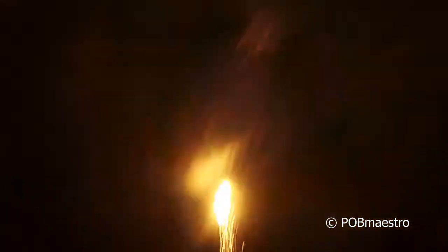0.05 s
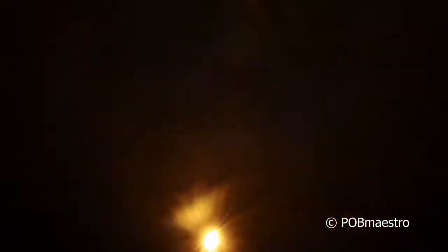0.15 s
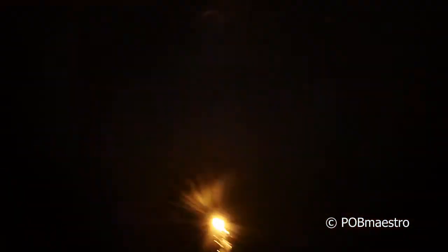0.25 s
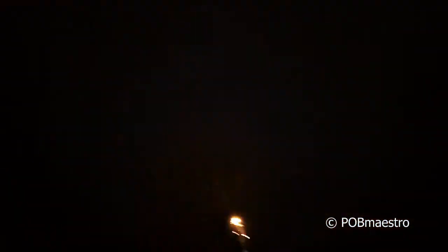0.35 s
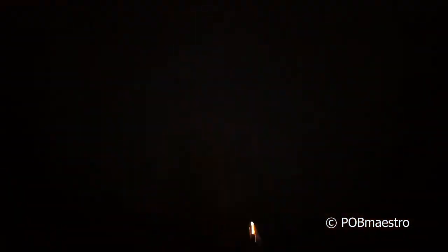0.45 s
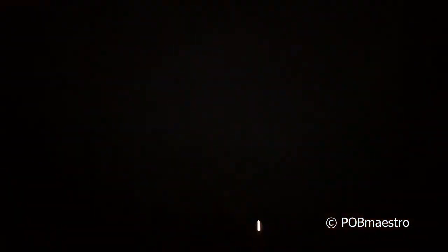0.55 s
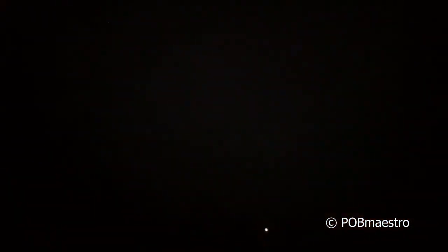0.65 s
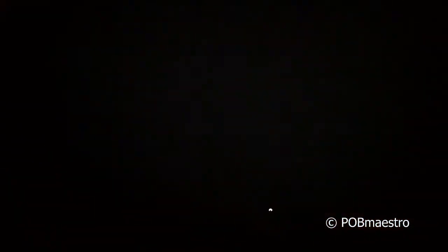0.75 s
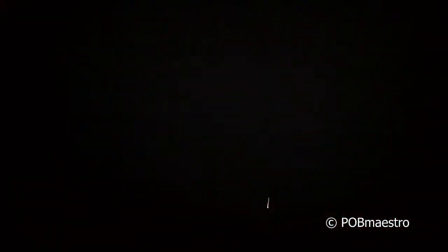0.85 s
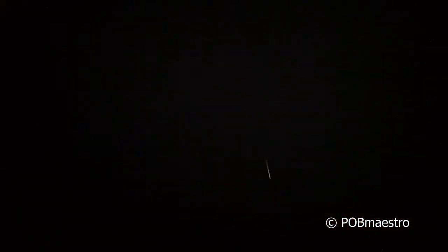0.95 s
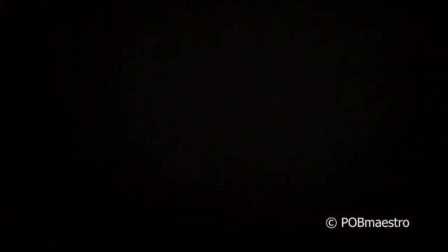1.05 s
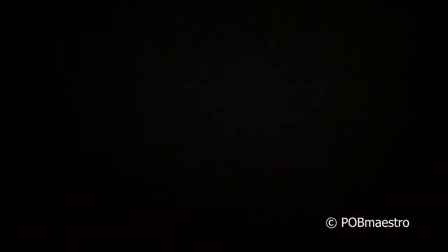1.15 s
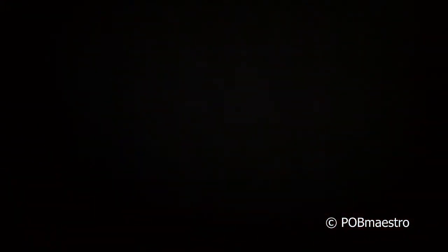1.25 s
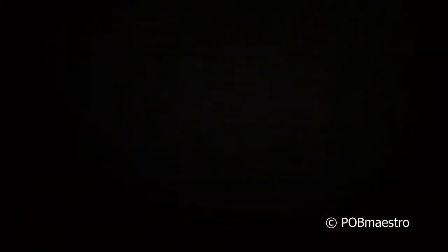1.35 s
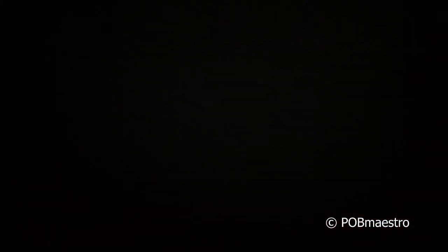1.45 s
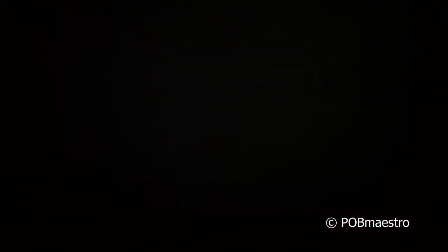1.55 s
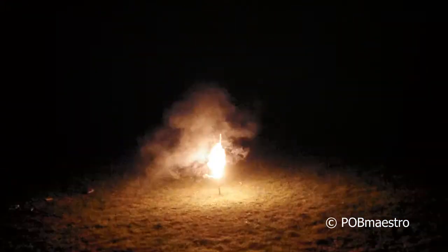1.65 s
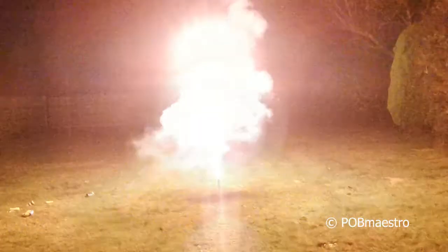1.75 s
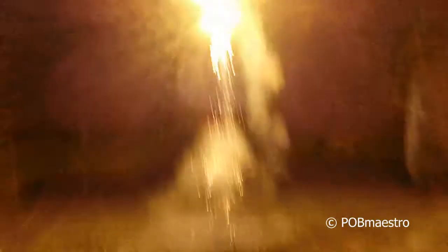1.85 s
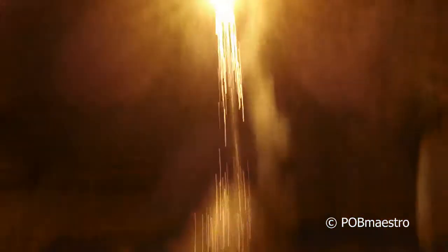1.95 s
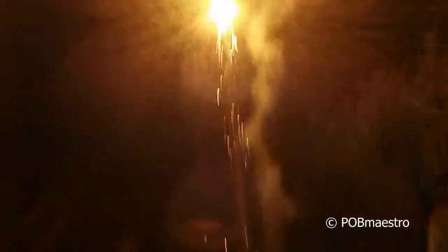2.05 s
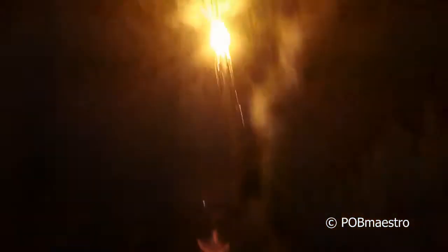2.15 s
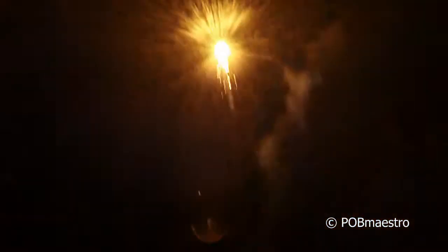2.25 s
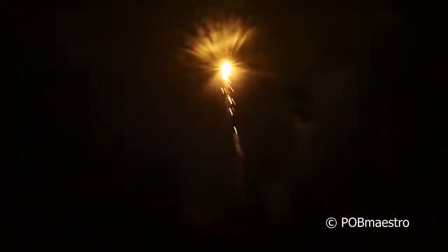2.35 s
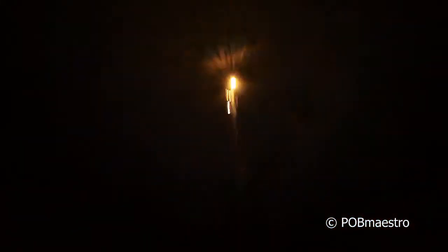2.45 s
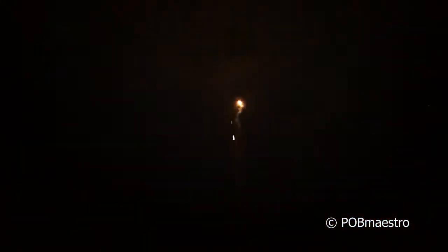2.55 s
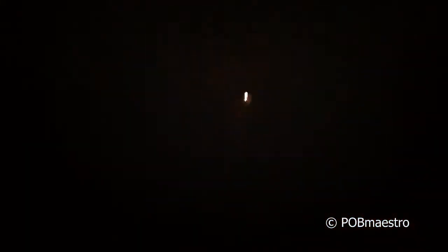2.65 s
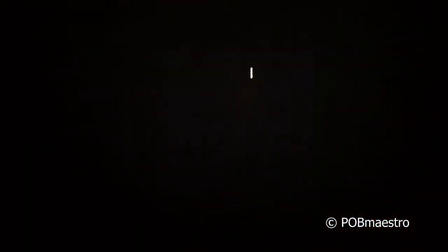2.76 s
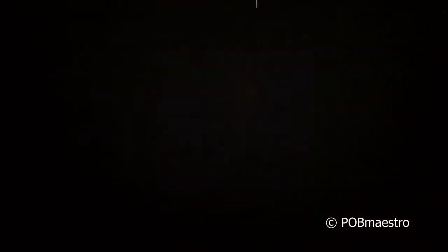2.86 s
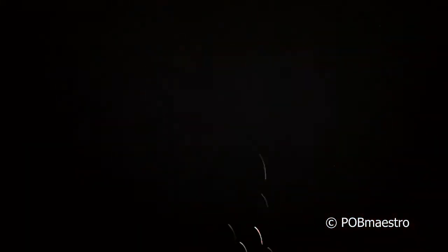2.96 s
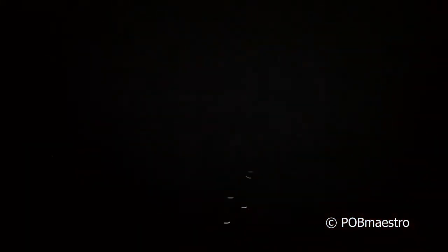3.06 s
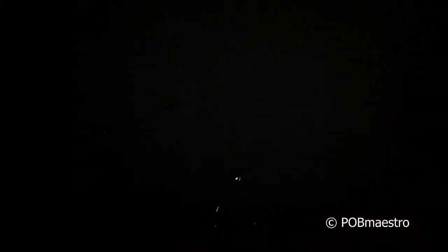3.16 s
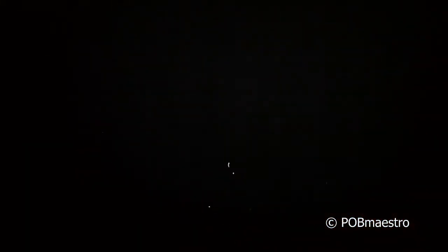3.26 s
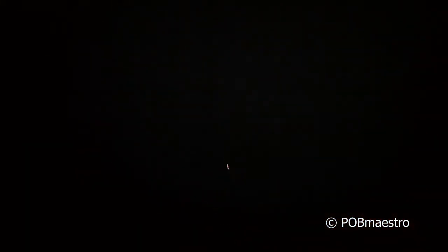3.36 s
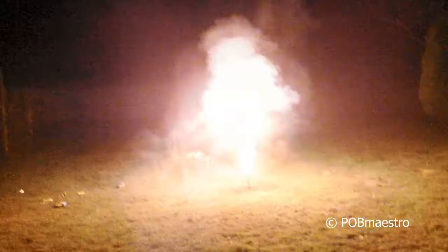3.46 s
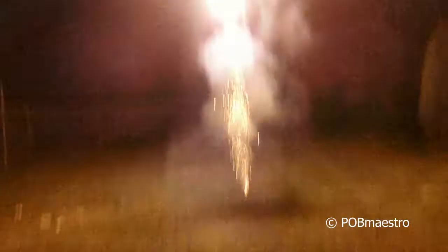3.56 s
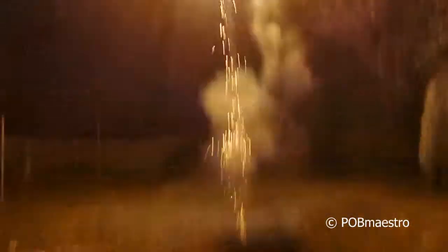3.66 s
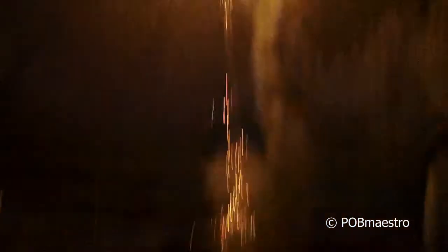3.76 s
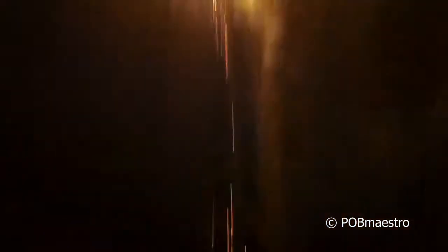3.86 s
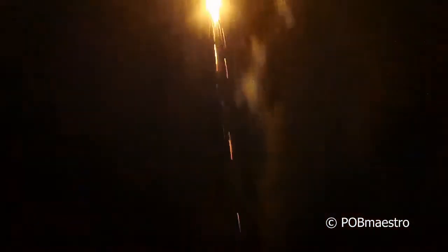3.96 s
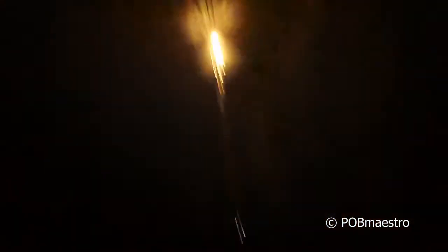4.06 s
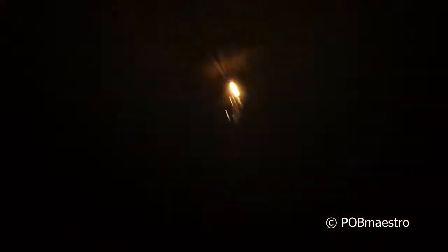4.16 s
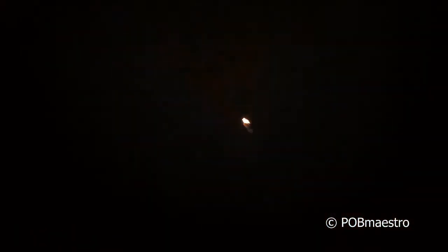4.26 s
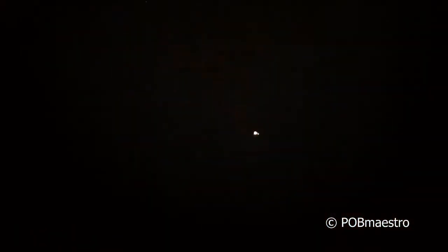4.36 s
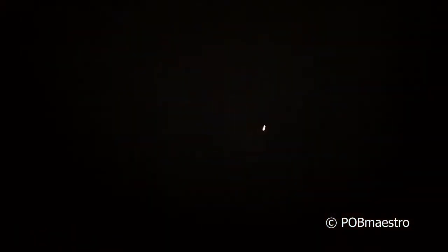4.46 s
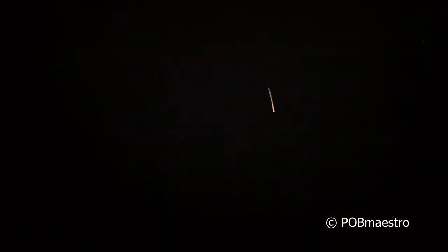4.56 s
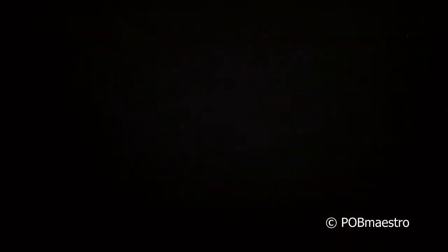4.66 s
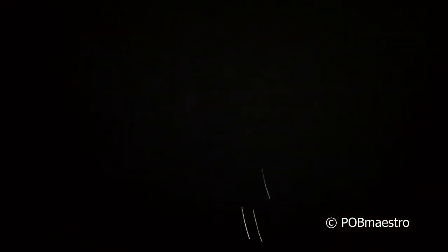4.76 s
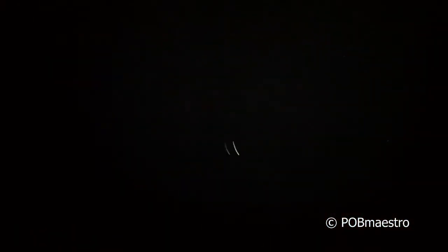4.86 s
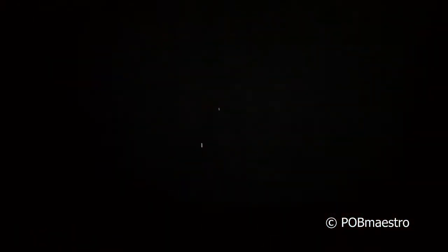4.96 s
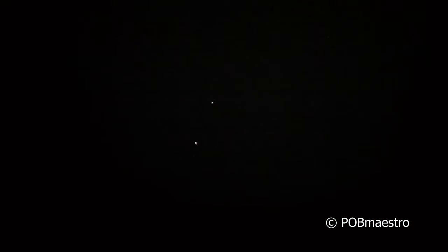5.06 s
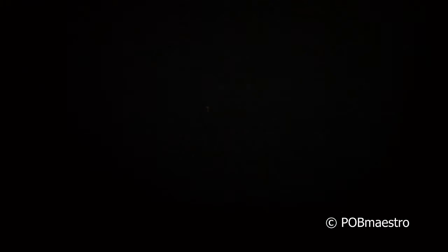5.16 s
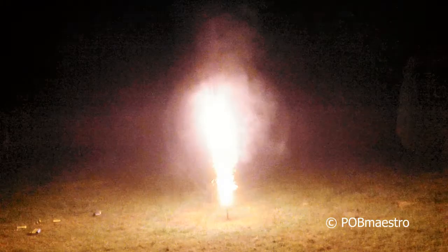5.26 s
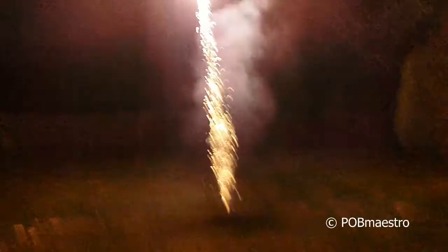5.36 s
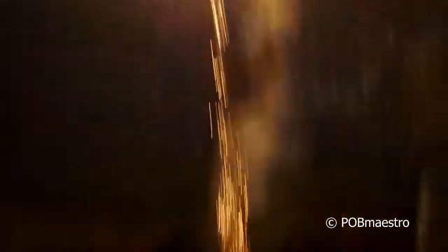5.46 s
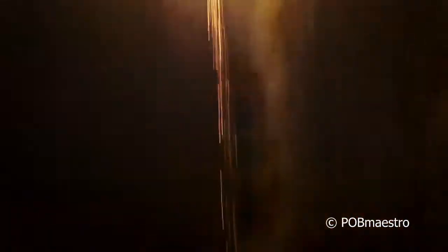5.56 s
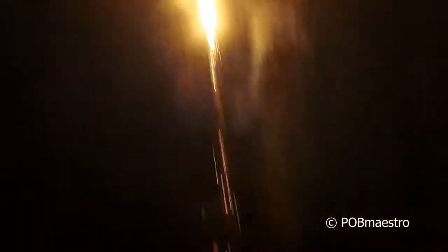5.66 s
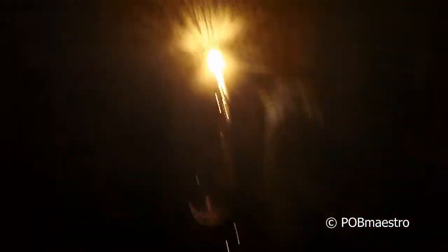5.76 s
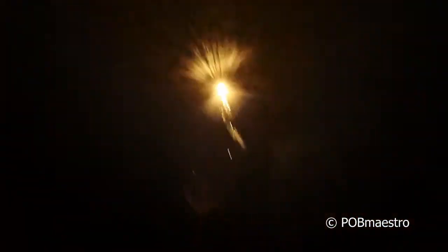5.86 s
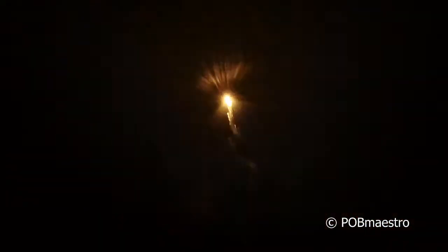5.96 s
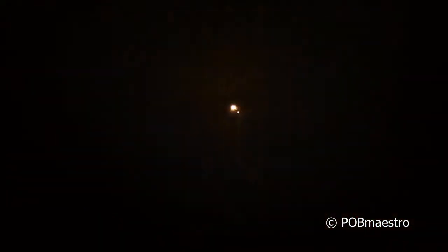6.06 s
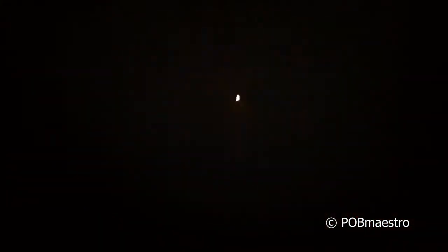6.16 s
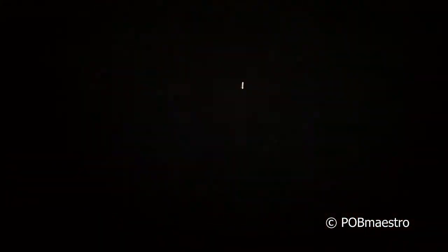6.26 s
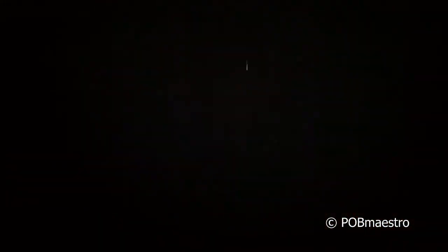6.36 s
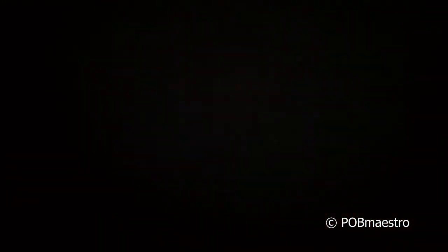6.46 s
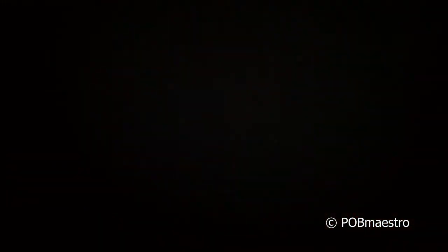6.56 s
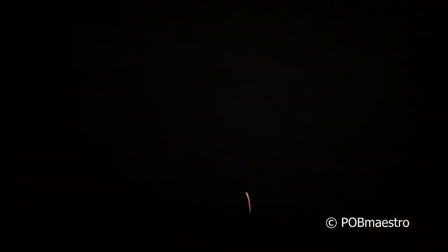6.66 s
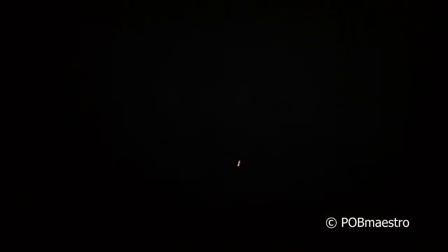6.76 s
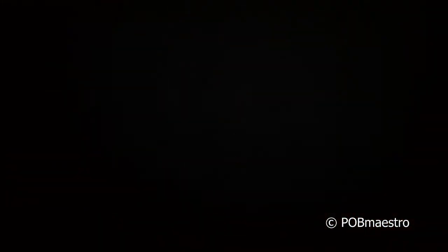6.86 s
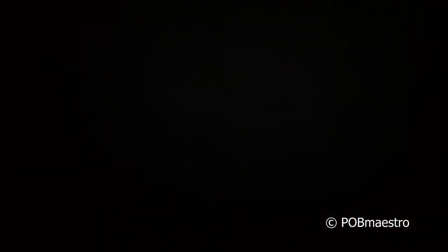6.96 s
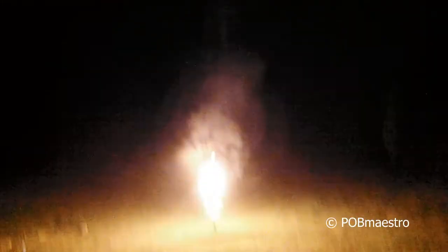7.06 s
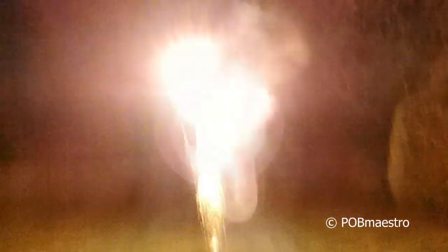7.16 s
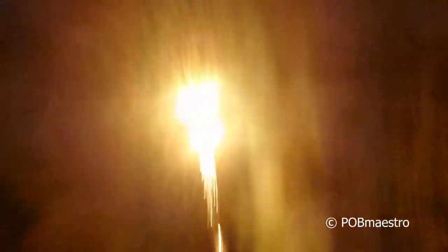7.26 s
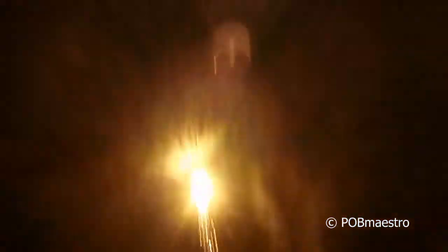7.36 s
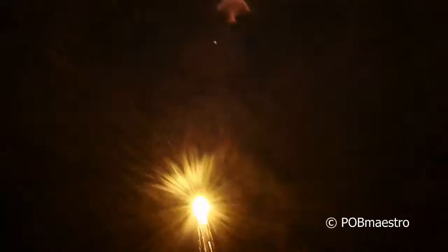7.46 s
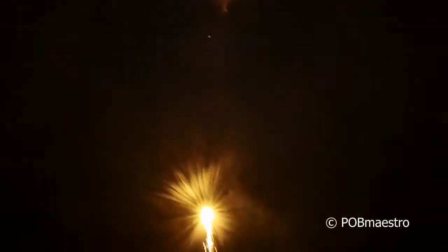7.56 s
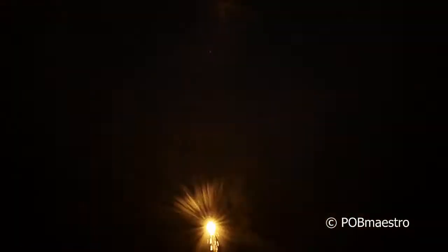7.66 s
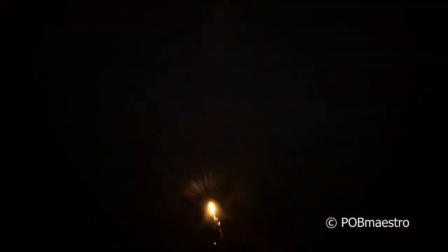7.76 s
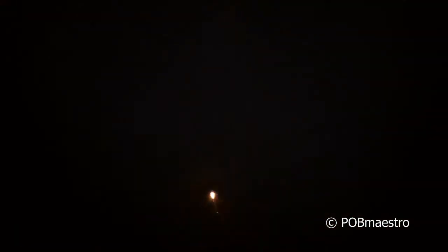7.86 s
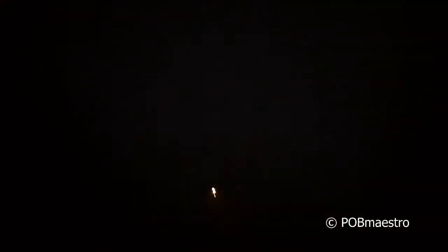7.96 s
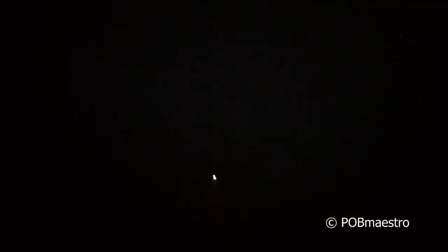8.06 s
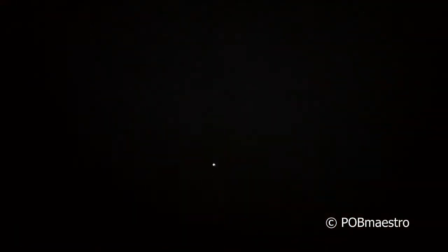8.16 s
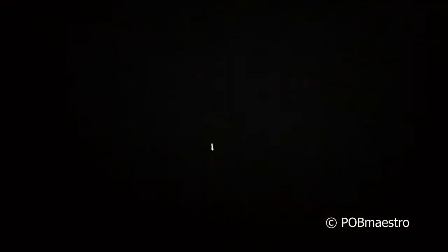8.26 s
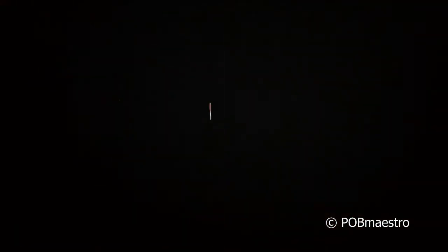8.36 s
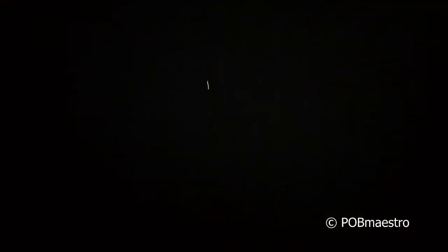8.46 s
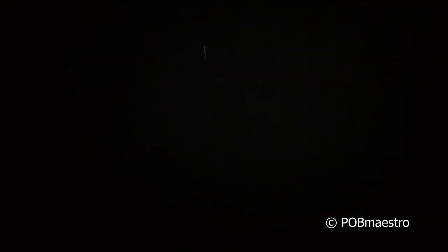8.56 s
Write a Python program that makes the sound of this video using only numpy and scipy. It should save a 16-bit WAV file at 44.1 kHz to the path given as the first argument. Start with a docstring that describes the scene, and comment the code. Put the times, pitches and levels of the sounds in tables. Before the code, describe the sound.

At 0 s the echo of an earlier firework shot is already fading, with a faint burning hiss and tiny fuse fizz in the first fifth of a second. Quiet follows: low, wavering outdoor rumble and thin microphone hiss, with weak fizzing near 1.2 s and soft dull thuds at 1.3 and 1.6 s. Sharp, hollow bangs then burst out at about 1.8, 3.55, 5.35 and 7.2 s. Each is a hard crack with a short gas rush and low-mid thump, instantly thickened by fence and wall echoes, then a thin rolling tail. The second is deeper, the third has the strongest thump, the last a longer gas rush. A faint star hiss swells and fades after each. Small dry snaps come at 2.2, 2.35 and 2.97 s; faint fizz at 3.0, 4.8 and 6.6 s, muffled bumps around 3.1, 6.3 and 6.6 s. The last echo sinks into rumble by about 8.6 s.

```python
"""A roman candle on a lawn at night fires four stars, after the fading echo of an earlier shot.
Each shot is a rush of noise for the gas, a short pressure swing for the blast, and a ring of tube tones.
Fences, trees, houses and single walls throw it back as filtered noise tails and delayed copies.
Shaped noise makes each star's hiss, the fuse's fizz and small dry snaps; damped low tones make soft thuds.
Behind it all lie a low outdoor rumble and the hiss of a small microphone."""
import sys
import numpy as np
from scipy import signal
from scipy.fft import rfft, irfft, next_fast_len
from scipy.io import wavfile

SR = 44100
rng = np.random.default_rng(int(sys.argv[2]) if len(sys.argv) > 2 else 0)


def wav_out(sig):
    """Save sig, one row per channel (or a flat mono array), as 16-bit PCM at SR to the path in sys.argv[1]."""
    wavfile.write(sys.argv[1], SR, np.round(np.clip(np.atleast_2d(sig).T, -1, 1) * 32767).astype(np.int16))


N = 379109  # length [samples]
AGE = np.arange(int(1.5 * SR)) / SR  # time axis of one event [s]
LEAD_S = 0.03  # room before each blast for the leaking gas


# Shots from the tube: (time [s], blast level [dB], blast pitch [Hz], puff level [dB], crack level [dB],
# gas t60 [s], treble gain [dB], low cut [Hz], star hiss level [dB])
SHOTS = [(-.25, -17.5, 285, -20, 1.5, .07, 0, 75, -55.5),
         (1.7981, -16.5, 300, -21, 1, 0.066, -2.5, 9.2, -46.5),
         (3.5601, -14.5, 241, -16, .5, 0.1, 0, 13, -54.5),
         (5.3736, -7.5, 313, -17.5, -4.5, 0.062, 3, 18, -62),
         (7.1915, -12, 323, -28, -3.5, 0.19, -0.5, 117, -51)]
# the leaking gas is louder with a harder crack (dB at a 0 dB crack, dB per dB)
GAS_DB, GAS_PER_CRACK = -16, 0.46
# the fireball's slow wave, as a share of the blast's pitch
PUFF_PITCH = 0.292
# echo levels of fences, trees and houses [dB]; decay of the houses' long tail [s]
BOOM_DB, TREES_DB, TAIL_DB, TAIL_T60_S = -18.5, -35, -36.5, 1.55
# a charge that burns longer than usual booms more (gas t60 [s], dB per doubling)
USUAL_BURN_S, BOOM_DB_PER_DOUBLING = 0.082, 3.5
# the trees answer the blast, the houses the crack (usual blast [dB], dB per dB, dB per dB)
USUAL_BLAST_DB, TREES_PER_BLAST, TAIL_PER_CRACK = -16, 0.68, 0.24


def candle():
    """Every shot with its echoes and its star; gas and echoes follow the strength of the charge."""
    out = np.zeros(N)
    for s, blast_db, hz, puff_db, crack_db, gas_t60, treble_db, low_hz, star_db in SHOTS:
        gas_db = GAS_DB + GAS_PER_CRACK * crack_db
        shot = muzzle(blast_db, hz, puff_db, PUFF_PITCH * hz, crack_db, gas_db, gas_t60)
        # no two charges burn alike: each has its own treble and its own lowest bass
        shot = colour(shot, [(3000, 0), (5000, treble_db), (7000, treble_db), (10000, 0)])
        bass_cut = signal.butter(2, low_hz, "high", fs=SR, output="sos")

        boom_db = BOOM_DB + BOOM_DB_PER_DOUBLING * np.log2(gas_t60 / USUAL_BURN_S)
        trees_db = TREES_DB + TREES_PER_BLAST * (blast_db - USUAL_BLAST_DB)
        tail_db = TAIL_DB + TAIL_PER_CRACK * crack_db
        with_echoes = garden(shot, hz, boom_db, trees_db, tail_db, TAIL_T60_S)
        add(out, s - LEAD_S, signal.sosfilt(bass_cut, with_echoes))
        add(out, s, undb(star_db) * burning_star(peak_s=0.21))
    return out


# Ring of the tube and its stand: (frequency [Hz], level relative to the blast [dB], t60 [s])
TUBE_RING = [(143.5, -26, 0.28), (196.1, -7, 0.23), (223, -22, 0.12), (311.2, -25, 0.4), (345.4, -12, 0.37),
             (416, -29, 0.18), (498, -55, 0.204), (592, -25, 0.083), (737, -34, 0.079), (747, -28, .17)]
# Colour of the rushing gas: (frequency [Hz], relative level [dB])
GAS_SPECTRUM = [(40, -7), (120, 3.5), (400, 8), (620, 4.5), (900, -2), (1250, 1.5), (1700, -3), (2300, 3),
                (3100, 2), (4400, -12.5), (6300, -14), (10000, -22.5), (15000, -38)]
# Colour of the sharp pressure front: (frequency [Hz], relative level [dB])
CRACK_SPECTRUM = [(60, -17), (500, -7), (1200, 1), (2400, 1), (3400, -8.5), (4500, -10.5), (6500, -10.5),
                  (10000, -32.5), (15000, -34)]


def muzzle(blast_db, hz, puff_db, puff_hz, crack_db, gas_db, gas_t60):
    """Gas leaks past the star, the pressure bursts out with a sharp front, and the tube rings."""
    t = AGE - LEAD_S
    tones = sum(undb(db) * np.sin(2 * np.pi * f * t) * fade(t, t60) for f, db, t60 in TUBE_RING)
    ring = (t > 0) * tones

    click = np.diff(1. * (t > -.0005), prepend=0)
    front = colour(click, CRACK_SPECTRUM)
    crack = undb(crack_db) * front / np.abs(front).max()

    # the leak opens 11 ms before the star is out
    leak = fade(t, 0.057) * np.clip(1 + t / 0.011, 0, 1) ** .5
    rush = np.where(t < 0, leak, fade(t, gas_t60))
    gas = undb(gas_db) * unit(colour(sputter(len(t), 1495, 2.15), GAS_SPECTRUM)) * rush

    blast = undb(blast_db) * (swing(t, hz, spread=4.2) + ring)
    # the growing fireball pushes a slower wave
    puff = undb(puff_db) * swing(t, puff_hz, spread=1.6)
    return blast + puff - crack + gas


def swing(t, hz, spread):
    """A cycle or two of pressure under a bell-shaped envelope; spread is its width in radians."""
    turn = 2 * np.pi * hz * t
    return np.sin(turn) * np.exp(-(turn / spread) ** 2 / 2)


# Colour of the burning star: (frequency [Hz], relative level [dB])
STAR_SPECTRUM = [(200, -5), (800, 9), (2800, 8), (4500, 5.5), (6500, 5.5), (10000, 0), (15000, -9)]


def burning_star(peak_s):
    """The star catches: its flickering hiss swells to a peak, then fades as it climbs away."""
    flare = (AGE / peak_s * np.exp(1 - AGE / peak_s)) ** 2
    return flare * unit(colour(sputter(len(AGE), 247.3, 2.4), STAR_SPECTRUM))


# Colour of the fences' boom for a 300 Hz blast: (frequency [Hz], relative level [dB])
FENCES_SPECTRUM = [(40, -4.5), (110, -4), (220, 2), (370, 2.5), (520, -13.5), (900, -18), (2700, -20),
                   (4400, -27.5), (6500, -33), (10000, -53.5), (15000, -76)]
# Colour of the echo off the trees: (frequency [Hz], relative level [dB])
TREES_SPECTRUM = [(60, -15), (130, -7.5), (210, 3), (380, -9), (600, -14), (1200, -11), (3000, -20.5),
                  (4500, -22), (6500, -25), (10000, -33), (15000, -43)]
# Colour of the long tail off the houses: (frequency [Hz], relative level [dB])
HOUSES_SPECTRUM = [(40, -9.5), (200, 4), (450, 0.5), (900, -2.5), (1800, -7.5), (3000, -5.5), (4500, -12.5),
                   (6500, -15), (10000, -22.5), (15000, -34)]
# Single walls: (delay [s], level [dB], lowest frequency [Hz], highest frequency [Hz])
WALLS = [(0.0126, -8, 58.5, 920), (0.0251, -12, 119, 704), (.038, -15.5, 148, 600), (.05, -9.5, 151, 610),
         (.1155, -23.5, 150, 5000), (.157, -23.5, 130, 380), (0.437, -47, 1800, 5000)]


def garden(shot, hz, boom_db, trees_db, tail_db, tail_t60):
    """Fences boom at once, a line of trees answers a little later, houses carry the long tail."""
    boom = [(f * hz / 300, db) for f, db in FENCES_SPECTRUM]  # a deeper blast gives a deeper boom
    out = shot + undb(boom_db) * scatter(boom, delay=0.0066, rise=0.0088, t60=0.28, grain_db=-1.0)
    out += undb(trees_db) * scatter(TREES_SPECTRUM, delay=0.094, rise=0.014, t60=0.44, grain_db=4.0)
    out += undb(tail_db) * scatter(HOUSES_SPECTRUM, delay=0.027, rise=0.011, t60=tail_t60, grain_db=0.5)
    # each wall returns one delayed, band-limited copy of the dry shot
    for delay, db, low_hz, high_hz in WALLS:
        add(out, delay, undb(db) * band(shot, low_hz, high_hz))
    return out


def scatter(spectrum, delay, rise, t60, grain_db):
    """Echoes off many small reflectors merge into an uneven roar that builds up, then dies away."""
    t = np.maximum(AGE - LEAD_S - delay, 0)
    echoes = sputter(len(t), 450, grain_db) * undb(0.25 * walk(53.9, len(t)))
    # twigs and slats split each echo into a short cluster, which ripples its colour
    cluster = rng.standard_normal(len(t)) * fade(AGE, 0.085)
    cluster /= np.linalg.norm(cluster)
    echoes = echoes + .5 * signal.fftconvolve(echoes, cluster)[:len(t)]
    return unit(colour(echoes, spectrum)) * (1 - np.exp(-t / rise)) * fade(t, t60)


# Spurts of burning powder: (time [s], level [dB], half length [s])
SPURTS = [(0.067, -48, 0.011), (0.141, -45.5, 0.052), (1.166, -58, .067), (1.295, -55, 0.015),
          (3.005, -51, 0.031), (3.06, -49, 0.018), (4.777, -54.5, 0.048), (4.927, -57.5, .022),
          (6.583, -54.5, .035), (6.717, -50, 0.031)]
# Colour of the fizzing fuse: (frequency [Hz], relative level [dB])
FIZZ_SPECTRUM = [(300, -16), (600, -4.5), (850, 3.5), (1300, -9), (2400, -3.5), (3200, 2), (3700, 0.5),
                 (4300, -5.5), (5500, -14), (10000, -22), (15000, -25)]


def fuse():
    """Burning powder spits sparks in short, uneven spurts."""
    time = np.arange(N) / SR
    flow = sum(undb(db) * np.exp(-((time - s) / length) ** 2 / 2) for s, db, length in SPURTS)
    sparks = sputter(N, 300, 3) * undb(1.5 * walk(60, N))
    return flow * unit(colour(sparks, FIZZ_SPECTRUM))


# Small dry snaps: a sharp echo of the second shot off a wall, and falling bits of casing:
# (time [s], level [dB], t60 [s], dull above [Hz])
SNAPS = [(2.235, -42.5, .04, 4000), (2.342, -34, 0.012, 680), (2.349, -32, 0.043, 500),
         (2.971, -43.5, 0.023, 4300)]


def snaps():
    """Short dry bursts of noise, one octave wide, with no ring."""
    out = np.zeros(N)
    for s, db, t60, dull_hz in SNAPS:
        burst = unit(band(rng.standard_normal(len(AGE)), 0.5 * dull_hz, dull_hz))
        add(out, s, undb(db) * burst * fade(AGE, t60))
    return out


# Soft thuds: (time [s], level before the rise and decay [dB])
THUDS = [(1.287, -32), (1.596, -35), (3.035, -37), (3.11, -35), (6.338, -37), (6.629, -35)]
THUD_HZ, THUD_T60_S = 92, 0.11  # shared by all


def thuds():
    """Dull, heavily damped bumps with a little noise in them."""
    out = np.zeros(N)
    for s, db in THUDS:
        noise = unit(lowpass(rng.standard_normal(len(AGE)), THUD_HZ))
        body = np.sin(2 * np.pi * THUD_HZ * AGE) + 0.14 * noise
        add(out, s, undb(db) * body * (1 - np.exp(-AGE * THUD_HZ)) * fade(AGE, THUD_T60_S))
    return out


# Colour of the distant night rumble: (frequency [Hz], relative level [dB])
NIGHT_SPECTRUM = [(20, -3.5), (35, 6), (55, -12.5), (80, 1), (95, -0.5), (125, -11), (230, -10.5),
                  (270, -13.5), (445, -13), (700, -17), (1100, -20), (1750, -23), (4500, -28), (7000, -30)]
NIGHT_DB = -51  # rms before the bass wavers


def night():
    """Distant rumble that wavers in the bass, under an even microphone hiss."""
    air = unit(colour(rng.standard_normal(N), [*NIGHT_SPECTRUM, (9000, -76)]))
    bass = lowpass(air, 106)
    air = air + bass * (undb(2.0 * walk(3.19, N)) - 1)
    hiss_spectrum = [(3000, -2.5), (6000, -12), (8000, 8.0), (11000, 0), (15000, 0.5)]
    hiss = colour(rng.standard_normal(N), hiss_spectrum)
    return undb(NIGHT_DB) * air + undb(-59.5) * hiss


def sputter(size, rate, rough_db):
    """Noise whose strength flickers from moment to moment."""
    return unit(rng.standard_normal(size) * undb(rough_db * walk(rate, size)))


def walk(rate, size):
    """Random drift: normal knots, rate per second, joined by straight lines."""
    knots = rng.standard_normal(size)
    return np.interp(np.arange(size) * rate / SR, np.arange(size), knots)


def colour(x, points):
    """Causal minimum-phase filter with a (frequency [Hz], level [dB]) response."""
    hz, db = np.transpose(points)
    size = 2 * next_fast_len(len(x) // 2 + 4096)
    log_hz = np.log(np.maximum(np.fft.rfftfreq(size, 1 / SR), 1))
    gain = undb(np.interp(log_hz, np.log(hz), db))
    # folding the cepstrum onto positive times makes the filter causal
    cepstrum = irfft(np.log(gain))
    cepstrum[1:size // 2] *= 2
    cepstrum[size // 2 + 1:] = 0
    return irfft(rfft(x, size) * np.exp(rfft(cepstrum)))[:len(x)]


def band(x, low_hz, high_hz):
    """Gentle band-pass, at least an octave wide."""
    high_hz = min(high_hz, SR / 3)
    edges = [min(low_hz, high_hz / 2), high_hz]
    return signal.sosfilt(signal.butter(2, edges, "band", fs=SR, output="sos"), x)


def lowpass(x, hz):
    """Gentle low-pass."""
    return signal.sosfilt(signal.butter(2, min(hz, SR / 3), fs=SR, output="sos"), x)


def fade(t, t60):
    """Exponential decay either side of t = 0, by 60 dB in t60 seconds."""
    return np.exp(-np.log(1000) * np.abs(t) / t60)


def undb(db):
    """Decibels to gain."""
    return 10 ** (np.asarray(db) / 20)


def unit(x):
    """Scale to rms 1."""
    return x / np.sqrt(np.mean(x ** 2))


def add(out, s, x):
    """Mix x into out from time s, dropping what falls outside."""
    i = int(round(s * SR))
    x = x[max(-i, 0):len(out) - i]
    out[max(i, 0):max(i, 0) + len(x)] += x


def scene():
    """The whole garden, in mono."""
    return (candle() + fuse() + snaps() + thuds() + night())[None]


# Narrow dips in the microphone's response: (frequency [Hz], width of one notch pass [Hz])
MIC_DIPS = [(8000, 2060), (11900, 190)]
TOP_HZ = 15350  # upper limit of the microphone


def record(dry):
    """A small microphone: no deep bass, a ceiling, two dips in the treble and a cut top."""
    x = signal.sosfilt(signal.butter(2, 18, "high", fs=SR, output="sos"), dry)
    x = np.clip(x, -.96, .96)
    for hz, width in MIC_DIPS:
        b, a = signal.iirnotch(hz, hz / width, fs=SR)
        x = signal.lfilter(b, a, signal.lfilter(b, a, x))  # two passes widen the dip
    return signal.sosfilt(signal.ellip(10, .2, 70, TOP_HZ, fs=SR, output="sos"), x)


dry = scene()
out = record(dry)
wav_out(out)
```